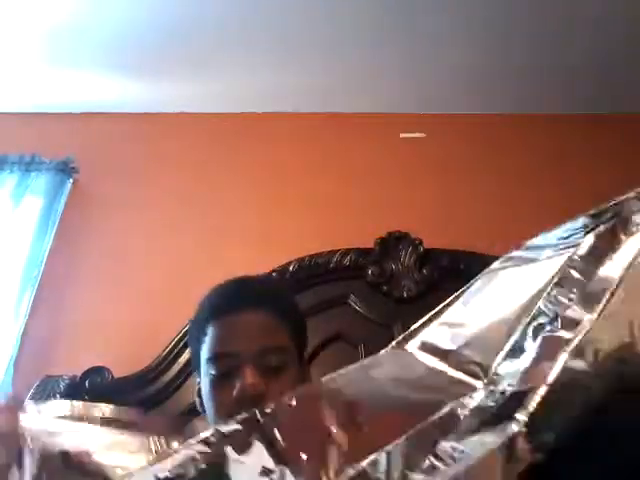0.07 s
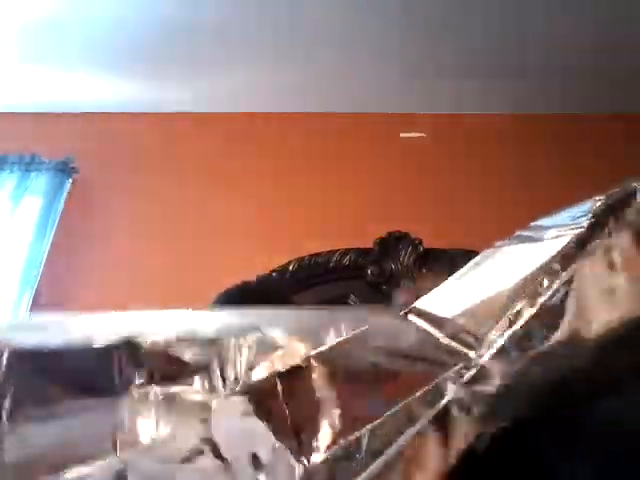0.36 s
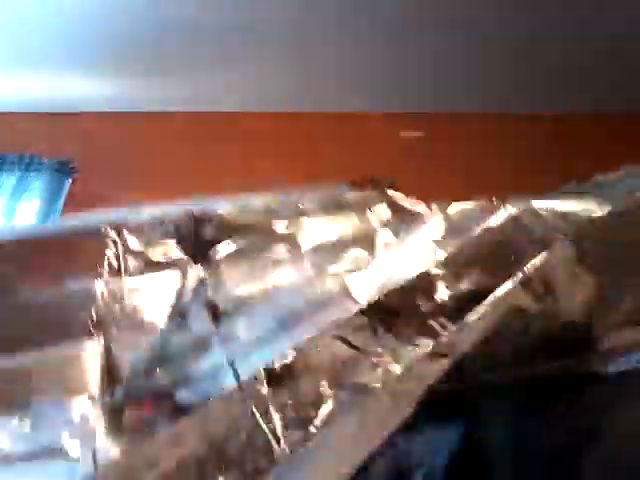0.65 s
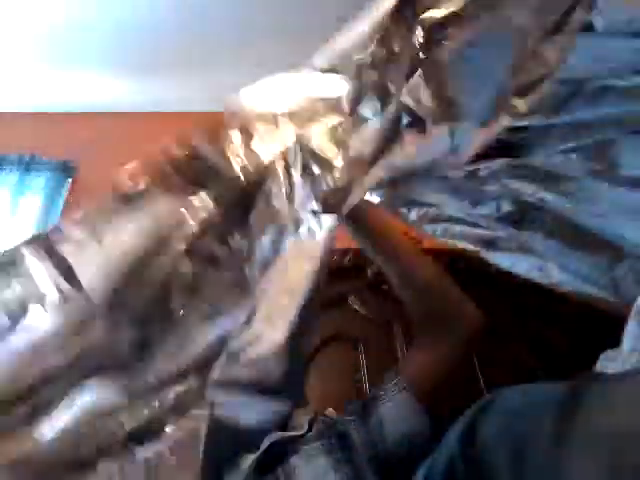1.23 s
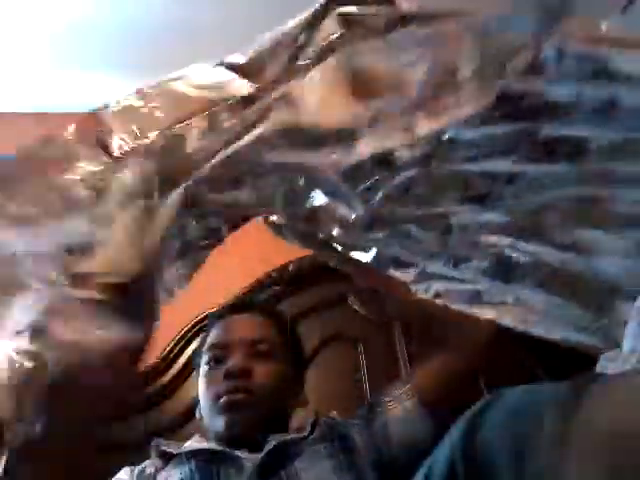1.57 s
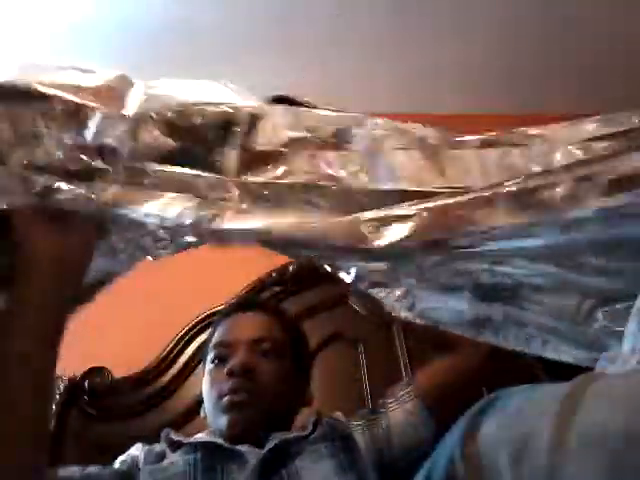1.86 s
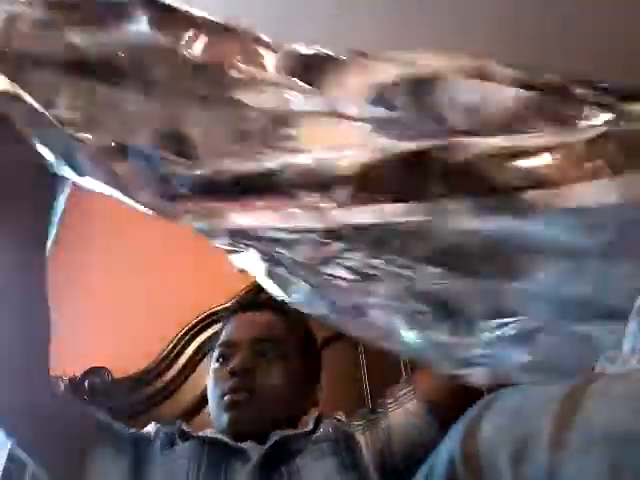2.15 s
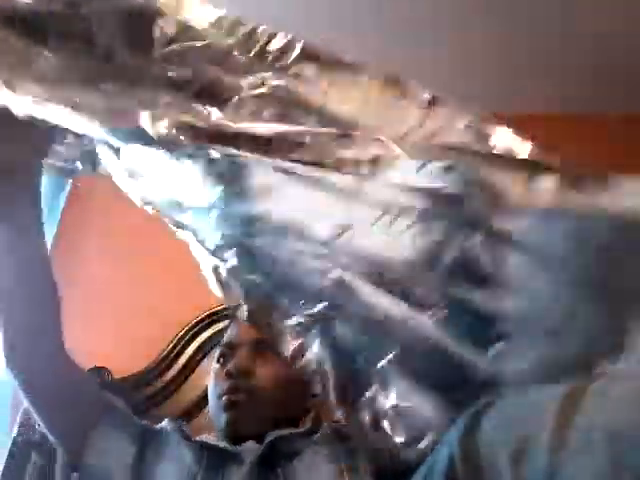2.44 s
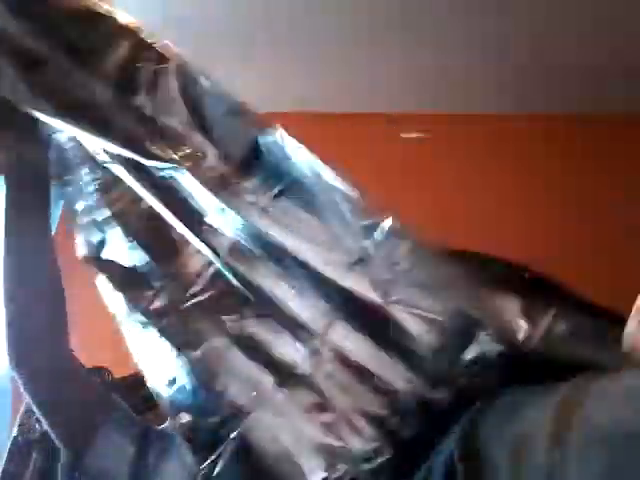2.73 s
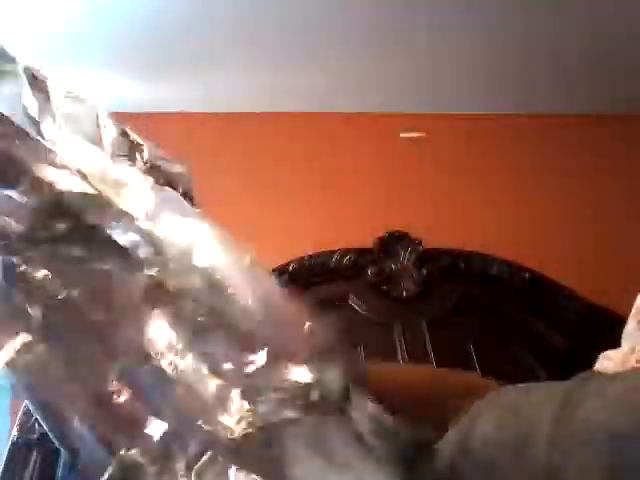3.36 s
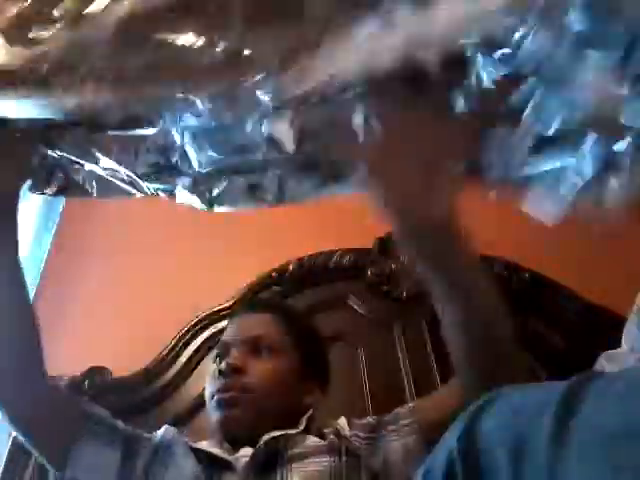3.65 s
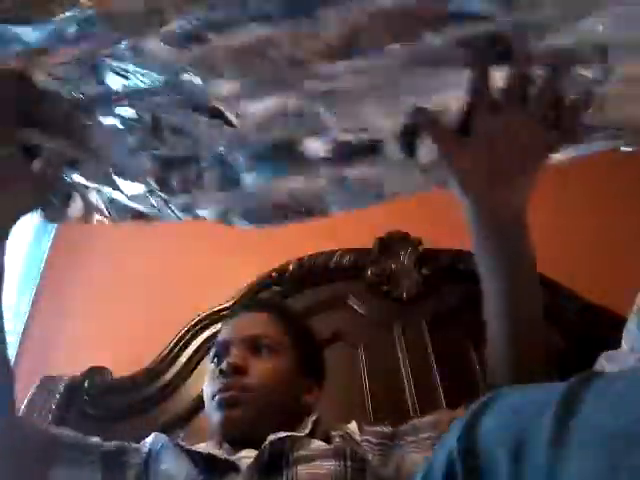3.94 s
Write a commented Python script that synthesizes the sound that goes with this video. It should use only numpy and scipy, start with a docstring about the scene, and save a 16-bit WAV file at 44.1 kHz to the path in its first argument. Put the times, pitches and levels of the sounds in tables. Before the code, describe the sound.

Bright, dense foil crinkling comes in uneven waves, with loud snaps and a faint low flutter as the big sheet billows. It is loudest near the end, heard close up in a small room through a trebly microphone.

```python
"""Foil sheet in a bedroom

A large sheet of metallic foil is lifted, shaken and spread close to a small microphone. Creases snap in
dense little avalanches, each ringing one facet of the sheet, and a few crack out loudly. Broad folds add
a papery rustle as wide panels flutter and flap. The room adds a short tail; the mic rings in the treble."""
import sys
import numpy as np
from scipy import signal
from scipy.fft import rfft, irfft
from scipy.io import wavfile

SR = 44100
rng = np.random.default_rng(int(sys.argv[2]) if len(sys.argv) > 2 else 0)


def wav_out(sig):
    """Save sig, one row per channel (or a flat mono array), as 16-bit PCM at SR to the path in sys.argv[1]."""
    wavfile.write(sys.argv[1], SR, np.round(np.clip(np.atleast_2d(sig).T, -1, 1) * 32767).astype(np.int16))


N = 176400


def amp(db):
    """Decibels to gain."""
    return 10 ** (np.asarray(db) / 20)


def unit(x):
    """Scale to an energy of one."""
    return x / np.sqrt(np.sum(x ** 2))


def curve(points):
    """Join (t/s, value) points by straight lines."""
    return np.interp(np.arange(N) / SR, *np.array(points, float).T)


def walk(per_s):
    """Random wander with a spread of one."""
    steps = rng.standard_normal(8192)
    wander = np.interp(np.arange(N) / SR * per_s, np.arange(len(steps)), steps)
    return wander / wander.std()


def colour(x, spectrum, size=4096):
    """Pass x through a causal filter of unit energy, shaped by (f/Hz, level/dB) points."""
    hz, db = np.array(spectrum, float).T
    bins_hz = np.fft.rfftfreq(size, 1 / SR) + 1
    gain = amp(np.interp(np.log(bins_hz), np.log(hz), db))
    cepstrum = irfft(np.log(gain))
    cepstrum[1:size // 2] *= 2  # minimum phase
    cepstrum[size // 2 + 1:] = 0
    response = unit(irfft(np.exp(rfft(cepstrum))))
    return signal.oaconvolve(x, response)[:N]


def resonate(x, hz, width_hz):
    """Two-pole band-pass with gain one at the centre."""
    return signal.lfilter(*signal.iirpeak(hz, hz / width_hz, fs=SR), x)


def shade(x, db, hz, width_hz):
    """Turn one band up or down."""
    return x + (amp(db) - 1) * resonate(x, hz, width_hz)


def smear(train, decay_s):
    """Turn every impulse into its own dying burst of ripples, with the same energy."""
    keep = np.exp(-2 / (decay_s * SR))
    power = signal.lfilter([1 - keep], [1, -keep], train ** 2 + 1e-18)
    return rng.standard_normal(len(train)) * np.sqrt(power)


def room_tone():
    """The faint, steady background of the bedroom."""
    # spectrum of the background: f/Hz, level/dB
    floor_colour = [(25, -39), (60, 5), (150, -3.5), (500, 3), (1200, -16), (4000, -6), (15000, -6)]
    return amp(-58) * colour(rng.standard_normal(N), floor_colour)


def room_tail(snap, t60_s=0.21, gap_s=0.003):
    """The nearby walls return a short, diffuse tail."""
    tail = smear(snap, t60_s / np.log(1000))
    return amp(-1) * np.pad(tail, (int(gap_s * SR), 0))[:len(snap)]


def billowing():
    """The whole sheet pumps air at the mic: an uneven low flutter."""
    # strength of the billowing: t/s, level/dB
    billow = [(0, -55.5), (.6, -53), (.88, -58.5), (1.02, -67), (1.18, -74), (1.3, -54), (1.7, -53.5),
              (2.2, -61), (2.85, -55), (2.98, -67), (3.23, -61), (3.34, -47), (3.52, -53), (3.85, -58.5)]
    # spectrum of the flutter: f/Hz, level/dB
    flutter_colour = [(25, -20), (40, -18), (55, -9.5), (100, -4.5), (180, -4), (260, -17), (600, -5.5),
                      (3000, -49)]
    level_db = curve(billow) - 6.5 + 4 * walk(per_s=24.8)
    return amp(level_db) * colour(rng.standard_normal(N), flutter_colour)


def flaps(rise_s=0.0085, glide=0.17, roughness=0.84):
    """Wide panels pull taut with a hollow flap that rises in pitch."""
    # flaps of a panel: t/s, level/dB, f/Hz
    pulls = [(0.58, -37, 175), (.605, -48, 76), (1.222, -37, 572), (1.321, -53, 95), (1.675, -51, 78),
             (1.816, -47, 287), (2.668, -45, 136), (2.783, -39, 174), (3.45, -45, 90)]
    out = np.zeros(N)
    for when, db, hz in pulls:
        age = np.maximum(np.arange(N) / SR - when, 0) / rise_s
        pitch = hz * (1 + glide * np.tanh(age / 2 - 1))
        tone = np.sin(2 * np.pi * np.cumsum(pitch * (age > 0)) / SR)
        ripples = resonate(resonate(rng.standard_normal(N), hz, hz), hz, hz)
        envelope = amp(db - 10) * age * np.exp(1 - age)
        out += envelope * (tone + roughness * ripples / ripples.std())
    return out


def facet(train, hz, click_s, ripple_db, ripple_s):
    """Each snap clicks into a damped facet, scatters as ripples through the sheet and sounds the room."""
    snap = smear(train, click_s) + amp(ripple_db) * smear(train, ripple_s)
    snap = snap + room_tail(snap)
    return amp(-12) * snap + resonate(snap, hz, width_hz=0.3 * hz)


def snaps(per_s, effort_db, spread_db, band_hz, click_s, ripple_db, ripple_s, facets=14):
    """Random snaps, mostly small, on facets that turn to and fro; per_s is the rate at 0 dB of effort."""
    low_hz, high_hz = band_hz
    chance = np.clip(per_s * amp(0.8 * effort_db) / SR / facets, 1e-9, 1)
    out = np.zeros(N)
    for hz in np.geomspace(low_hz, high_hz, facets):
        fires = rng.random(N) < chance
        size_db = spread_db * np.minimum(rng.standard_exponential(N), 2.8)
        # gentle motion favours the small, high facets
        bend_db = 0.044 * effort_db * np.log2(np.sqrt(low_hz * high_hz) / hz)
        turn_db = 1.5 * walk(per_s=25)
        train = fires * amp(size_db + bend_db + turn_db) / np.sqrt(chance)
        out += unit(facet(train, hz, click_s, ripple_db, ripple_s))
    return out / out.std()


def taut_panels():
    """One panel after another comes taut and colours the crinkling with its own pitch."""
    # ringing panels: peak t/s, half length/s, level/dB, f/Hz
    panels = [(0.067, 0.037, -54, 415), (0.41, 0.14, -52.5, 508), (0.624, 0.064, -49, 2740),
              (1.04, .025, -59, 890), (1.822, 0.11, -41.5, 3920), (1.874, 0.01, -48, 1330),
              (2.115, 0.1, -54, 2230), (3.34, 0.039, -42.5, 1430)]
    crinkle = snaps(per_s=1100, effort_db=0, spread_db=4.5, band_hz=(410, 4000),
                    click_s=0.00036, ripple_db=1.5, ripple_s=0.005, facets=6)
    out = np.zeros(N)
    for when, half_s, db, hz in panels:
        width_hz = 0.2 * hz
        body = resonate(resonate(crinkle, hz, width_hz), hz, width_hz)
        swell = np.exp(-0.5 * ((np.arange(N) / SR - when) / half_s) ** 2)
        out += amp(db - 4) * swell * body / body.std()
    return out


def cracks(size=8192):
    """Stiff creases give way all at once, loud at this short distance."""
    # single cracks: t/s, level/dB, facet f/Hz, ripples relative to the click/dB
    buckles = [(0.3708, -4.5, 4040, 8), (.46, -5, 5500, 12), (0.509, -4, 6000, 0), (0.5902, -1.5, 3020, -5),
               (.662, -2.5, 5100, -1), (0.7632, 3.5, 4750, 6), (0.7831, -7.5, 1380, 6),
               (0.8777, 1, 5070, 9), (.988, -11, 13000, -2), (1.231, -12, 4500, 2), (1.2665, 1, 3670, 4),
               (1.2967, -5, 5500, -4), (1.3286, -0.5, 5500, 4), (1.5072, 3.5, 5500, -6),
               (1.8381, 0.5, 6000, 7), (2.0845, -16, 1500, -5), (2.308, -1, 4260, 0),
               (2.3192, -0.5, 3200, 1), (2.411, 0, 6050, -7), (2.4915, 1, 5500, 3),
               (2.5956, -10, 1900, -10), (2.7851, 1.5, 5500, 3), (3.059, -9, 9100, 0),
               (3.1105, -8, 6230, 4), (3.134, -5, 6600, 15), (3.1781, -5.5, 7400, 1),
               (3.264, -5.5, 1790, 12), (3.3792, -1, 6500, -4), (3.793, 0.5, 6000, 12),
               (3.8932, -3.5, 6600, -3), (3.9235, -5.5, 6530, -2), (3.9776, 6, 5060, 2)]
    # spectrum of the cracks: f/Hz, level/dB
    crack_colour = [(200, -15), (1500, 1.5), (5000, -3.5), (7000, -7), (9500, -10.5), (15500, 4)]
    out = np.zeros(N + SR)
    for when, db, hz, ripple_db in buckles:
        start = int(when * SR)
        snap = facet(signal.unit_impulse(size), hz, click_s=0.0004, ripple_db=ripple_db, ripple_s=0.0035)
        out[start:start + size] += amp(db - 7) * unit(snap)
    return colour(out[:N], crack_colour)


def crinkling(reference_db=-35):
    """Faster motion sets off more and louder snaps, in avalanches: creases, broad folds and fine ticks."""
    # motion of the sheet: t/s, level/dB
    motion = [(0.0, -39.5), (0.41, -44), (0.47, -34), (0.68, -34.5), (0.76, -38), (0.77, -33.5),
              (0.85, -36.5), (0.88, -33.5), (0.97, -47), (1.06, -41.5), (1.1, -45), (1.19, -45.5),
              (1.225, -33.5), (1.39, -35), (1.46, -30), (1.65, -31.5), (1.78, -28.5), (2.18, -38),
              (2.53, -30.5), (2.63, -36), (2.66, -32.5), (2.72, -38), (2.76, -33.5), (2.9, -36),
              (2.95, -47), (3.19, -43), (3.24, -56), (3.27, -37.5), (3.35, -27), (3.42, -28.5), (3.48, -23),
              (3.58, -28.5), (3.78, -31), (3.79, -31), (3.87, -39), (4.0, -33.5)]
    # strength of the broad folds: t/s, level/dB
    folding = [(.17, -53), (.22, -47), (.33, -47.5), (.6, -42), (.75, -48.5), (.78, -44.5), (.9, -50),
               (.99, -62.5), (1.05, -57), (1.15, -66), (1.205, -51.5), (1.24, -43.5), (1.37, -45.5),
               (1.44, -42.5), (1.69, -44.5), (1.75, -40), (2.18, -51.5), (2.36, -49.5), (2.53, -42.5),
               (2.62, -51), (2.73, -48.5), (2.79, -43), (2.9, -48), (2.95, -56.5), (3.25, -55),
               (3.3, -40.5), (3.5, -38), (3.56, -42.5), (3.79, -45.5), (3.88, -55.5)]
    # spectra of the three kinds of snap: f/Hz, level/dB
    crease_colour = [(300, -34), (1200, -7), (2200, -9.5), (3200, -8), (5000, -5.5), (6500, -4.5),
                     (8000, -12), (9500, -13.5), (11500, -8.5), (14000, -1.5), (15500, -1)]
    fold_colour = [(40, -43), (100, -6), (200, 2.5), (300, 1), (480, -3), (800, -1), (1150, -4), (2000, 2),
                   (2500, -0.5), (3200, 2), (6000, 2.5), (12000, -27.5)]
    tick_colour = [(500, -30), (3000, -44), (6500, -4), (9500, -12.5), (13000, -7), (15500, -3)]
    avalanche_db = 0.7 * walk(per_s=190)
    effort_db = curve(motion) - reference_db + avalanche_db
    creases = snaps(per_s=2400, effort_db=effort_db, spread_db=4.5, band_hz=(2600, 8250),
                    click_s=0.00045, ripple_db=-0.5, ripple_s=0.005)
    folds = snaps(per_s=1100, effort_db=effort_db, spread_db=1.5, band_hz=(306, 3210),
                  click_s=0.00083, ripple_db=-0.5, ripple_s=0.0071)
    ticks = snaps(per_s=320, effort_db=effort_db, spread_db=3, band_hz=(6940, 15900),
                  click_s=0.0001, ripple_db=-9, ripple_s=0.0015)
    return (amp(reference_db - 4 + effort_db) * colour(creases, crease_colour)
            + amp(curve(folding) + avalanche_db) * colour(folds, fold_colour)
            + amp(reference_db - 13.5 + 0.55 * effort_db) * colour(ticks, tick_colour))


def rustle():
    """The crinkling starts slightly dull and opens up; its mids thin and fill as the sheet moves."""
    # gain of the mids: t/s, level/dB
    hollow = [(.27, 1.5), (.38, -8), (.48, 0.5), (.62, -3.5), (.8, -3.5), (1.4, -3.5), (1.9, 0),
              (2.04, -1.5), (2.36, -4), (2.55, 1)]
    # gain of the upper mids: t/s, level/dB
    presence = [(.16, -1), (.22, 1.5), (.5, 0)]
    hollowed = shade(crinkling(), curve(hollow), hz=1320, width_hz=1000)
    return shade(hollowed, curve(presence), hz=3520, width_hz=1600)


def scene():
    """The foil close up, in mono, over the room tone."""
    return (room_tone() + rustle() + taut_panels() + cracks() + billowing() + flaps())[None]


def record(dry):
    """The small microphone rings in the treble; the deep bass and the very top are cut steeply."""
    heard = shade(dry, db=11, hz=6650, width_hz=1126)
    low_cut = signal.butter(3, 38, "high", fs=SR, output="sos")
    high_cut = signal.ellip(12, 0.2, 90, 15780, fs=SR, output="sos")
    return signal.sosfilt(high_cut, signal.sosfilt(low_cut, heard))


dry = scene()
out = record(dry)
wav_out(out)
```